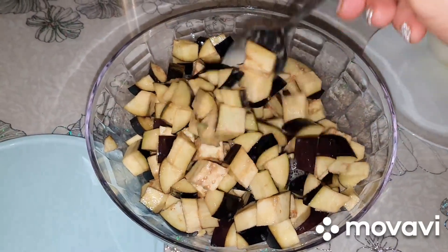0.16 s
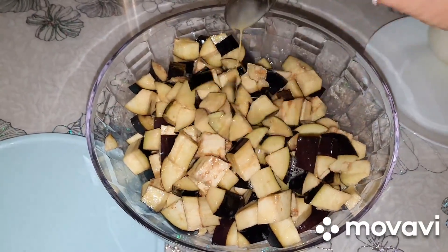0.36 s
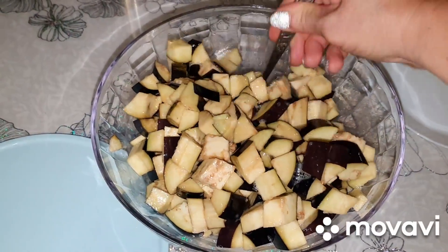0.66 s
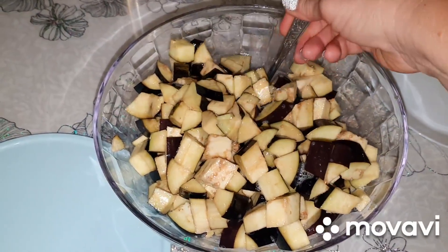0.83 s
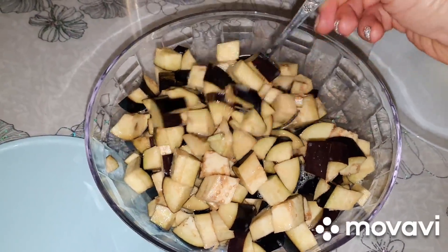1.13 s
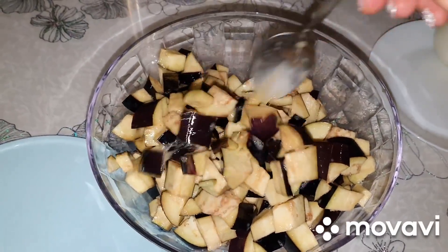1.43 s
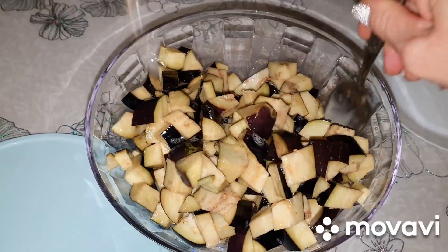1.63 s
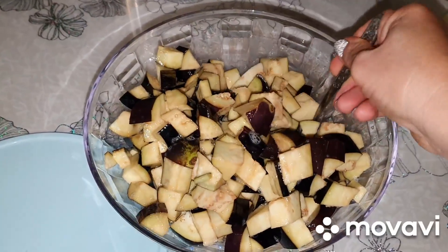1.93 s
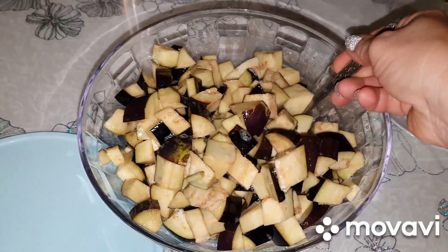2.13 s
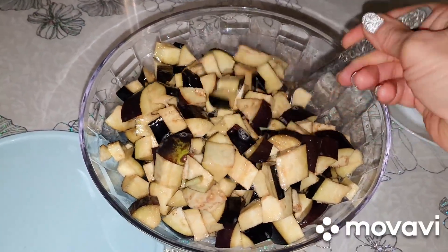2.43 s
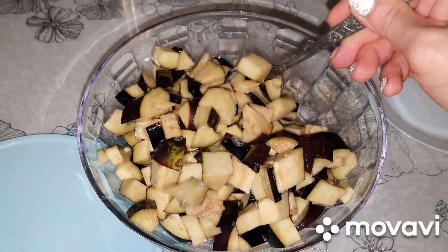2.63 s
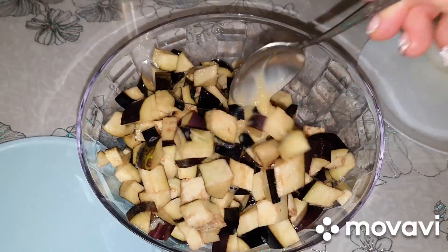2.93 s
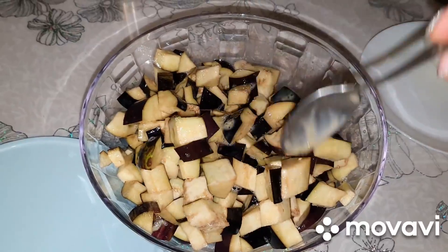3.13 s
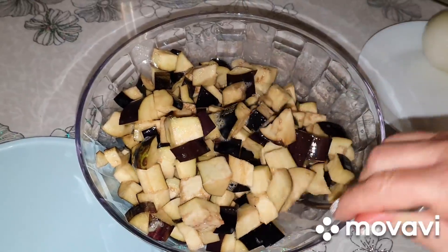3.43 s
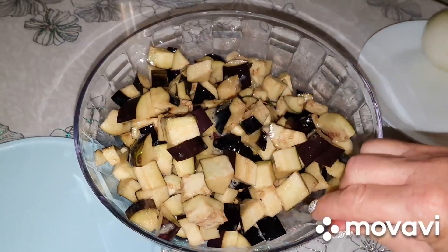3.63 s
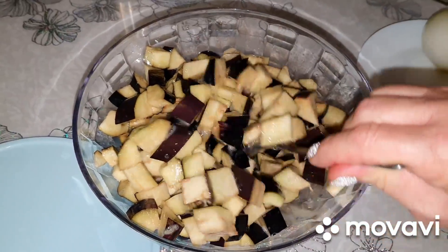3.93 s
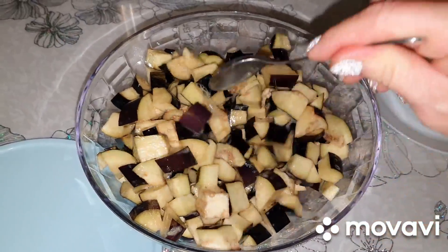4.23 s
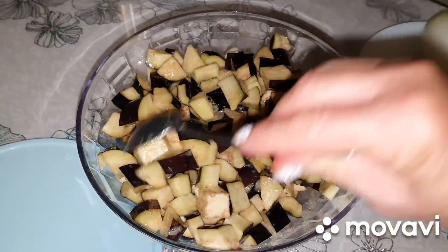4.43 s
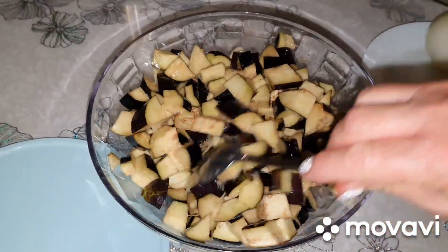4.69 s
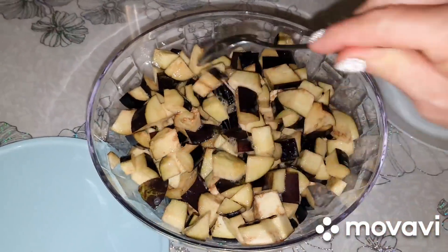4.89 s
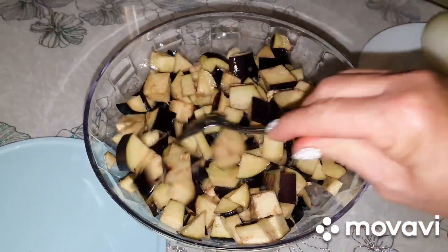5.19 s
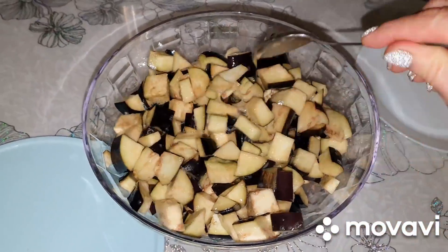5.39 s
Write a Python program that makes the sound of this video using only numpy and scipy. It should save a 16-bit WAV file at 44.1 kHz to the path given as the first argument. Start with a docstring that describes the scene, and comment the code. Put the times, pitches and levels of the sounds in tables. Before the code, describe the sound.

A metal spoon stirs chopped aubergine in a glass bowl, heard close in a kitchen with a short echo. Throughout, the moist pieces softly rub, tick and plop in uneven strokes. The spoon clinks at about 0.5 seconds and gives a louder, muffled clack at 0.7; the filling damps the glass, so it rings only briefly. Two more clacks come at 1.6 and 1.9 seconds, with a tiny squeak of metal on glass. Between 2.1 and 2.4 seconds the bowl rocks on the table in three fading thuds. After quiet shuffling, firm knocks land at 3.3 and 3.6 seconds, with pieces tumbling between them. Another clack follows at 4.6, then gentle stirring and a faint tap near 5.3 seconds. Underneath are faint room hiss, table rumble and a low drone that swells slightly after the heavier knocks.

```python
"""Kitchen table, close stereo microphones: a metal spoon stirs chopped aubergine in a glass bowl.
The filling damps the glass, so each blow is a short clack that the kitchen throws back. The moist pieces
tumble, rub, tick and plop; the spoon sticks and slips on the glass; the bowl rocks and thuds on the table.
Underneath: table rumble, room hiss and a low drone that swells after the heavy blows."""
import sys
import numpy as np
from scipy import signal
from scipy.fft import rfft, irfft
from scipy.io import wavfile
from scipy.ndimage import uniform_filter1d

SR = 44100
rng = np.random.default_rng(int(sys.argv[2]) if len(sys.argv) > 2 else 0)


def generate_wav(sig):
    """Save sig (samples, or channels by samples) to the path in sys.argv[1] as 16-bit PCM at SR."""
    pcm = np.round(np.clip(np.atleast_2d(sig).T, -1, 1) * 32767).astype(np.int16)
    wavfile.write(sys.argv[1], SR, pcm)


N = 244755

# room hiss spectrum (frequency [Hz], gain [dB])
HISS_EQ = [(24, -30), (40, -3), (109, -6), (176, -18), (297, -10.5), (831, -23), (1070, -28.5), (2150, -36),
           (2380, -37.5), (2770, -36), (3140, -30.5), (7360, -44.5), (14500, -43.5), (16000, -56)]
# narrow hiss bands (centre [Hz], width [Hz], level [dB])
HISS_BANDS = [(298, 82, -66), (520, 110, -73), (1120, 130, -76), (2417, 170, -79), (3190, 190, -76),
              (4050, 130, -86), (14450, 350, -89)]
# drone envelope (time [s], level [dB])
DRONE_LEVELS = [(0, -49), (0.35, -55), (0.9, -46.5), (1.25, -70), (1.65, -52), (2.2, -55.5), (2.9, -49),
                (3.3, -51.5), (3.5, -47), (3.8, -53.5), (3.9, -51), (4.33, -58), (4.75, -44), (5.2, -57),
                (5.35, -50.5), (5.5, -82)]
# spoon pushes through the pieces (start [s], length [s], rub [dB], wetness re rub [dB], bulk re rub [dB])
STROKES = [(0.0, 0.3, -57, -8.5, -0.5), (0.51, 0.24, -45, -11.5, 3), (0.91, 0.35, -58, -10, -6),
           (1.335, 0.27, -61.5, -6.5, 0.5), (1.74, 0.13, -48.5, -11, 7.5), (2.099, 0.3, -59, -18.5, 6),
           (2.441, 0.43, -62, -7, 0.5), (3.407, 0.21, -44, -18, -5.5), (3.823, 0.19, -57, -9.5, -3),
           (4.031, 0.28, -63, -3.5, 1), (4.509, 0.19, -53, -4, -2.5), (4.722, 0.12, -68, 1, 8),
           (5.002, 0.34, -58, -8, -1.5), (5.133, 0.25, -63, -2.5, 4), (5.508, 0.048, -55, -7.5, 4.5)]
# spectra of table rumble, tumbling, rubbing, wet crackle, contact chatter (frequency [Hz], gain [dB])
RUMBLE_EQ = [(45, -29.5), (70, -22.5), (85, -8.5), (104, 2.5), (130, -7.5), (180, -27), (400, -58.5)]
TUMBLE_EQ = [(100, -28), (170, -5), (240, 4.5), (300, 4), (400, -7), (600, -11.5), (900, -41),
             (2000, -48.5)]
RUB_EQ = [(400, -23), (750, -4.5), (1100, 0), (1700, -5), (2400, -8), (3300, -10.5), (4500, -18),
          (7000, -31.5), (12000, -44.5)]
CRACKLE_EQ = [(2000, -21.5), (4500, 3.5), (7500, -2.5), (10000, 1.5), (13000, 0.5), (16000, 2)]
CHATTER_EQ = [(150, -20), (700, 6.5), (2000, 3), (14000, -2)]
# single pieces slip, drop or touch the spoon (time [s], tap [dB], wet snap [dB])
TICKS = [(0.126, -57, -61), (0.235, -55, -59), (0.346, -58.5, -71), (0.572, -44.5, -53),
         (0.639, -42.5, -65), (0.976, -46.5, -64), (1.043, -61, -87), (1.162, -57.5, -67.5),
         (1.361, -65.5, -57), (1.442, -70.5, -57.5), (2.132, -53.5, -92), (2.558, -58.5, -87),
         (2.824, -62.5, -65.5), (3.472, -43, -78), (3.482, -39, -75), (3.642, -47, -70),
         (3.912, -52.5, -73), (4.103, -58.5, -63), (4.252, -69, -56.5), (5.056, -62.5, -57),
         (5.135, -57.5, -80), (5.517, -64, -61)]
# cubes fall back on the heap (time [s], level [dB])
PLOPS = [(0.255, -54), (0.624, -45), (0.985, -47.5), (1.556, -49.5), (3.197, -48.5), (3.506, -40),
         (4.116, -62), (5.282, -46), (5.405, -48.5)]
# spoon strikes the bowl, muffled when buried (time [s], level [dB], muffling [dB], low weight [dB],
# main ring [Hz], ring re crack [dB], left minus right [dB], push on table [dB])
KNOCKS = [(0.5081, -34, 0.5, -5, 2940, 15, 0, -54), (0.5811, -40.5, 3.5, -1.5, 1660, -1, -1, -61),
          (0.6943, -42.5, 10.5, -9, 1290, 15, -4, -69.5), (0.7155, -19, 11, -0.5, 1069, 22, -1, -37.5),
          (1.6454, -24, 0.5, -0.5, 3250, 12.5, 0.5, -58), (1.8892, -24, 8.5, -0.5, 2620, 12, -0.5, -40),
          (2.377, -54, 1, -6, 1650, 13, -2.5, -80), (3.2797, -51.5, 4.5, 1.5, 1600, 7, -0.5, -70.5),
          (3.3304, -24, 1, 4.5, 508, 10.5, 0.5, -49), (3.5799, -24.5, 11, -1.5, 764, 11, -1.5, -42.5),
          (3.6911, -42.5, 12.5, -4, 1650, 24, 3, -74), (4.5773, -29.5, 3.5, 1, 2117, 12, 2, -64.5),
          (5.2805, -47, 10, 3.5, 1060, 28, 0.5, -63.5)]
# modes of the filled bowl (frequency [Hz], level re crack [dB], T60 [s])
BOWL_MODES = [(97.2, 16.5, 0.13), (249, 10.5, 0.052), (352, 6.5, 0.053), (510, 6, 0.031), (723, 13, 0.13),
              (970, 8.5, 0.021), (1430, 3, 0.039), (1600, 7, 0.11), (1975, 0, 0.11), (2530, 9, 0.04),
              (3120, 3.5, 0.018), (3860, 2.5, 0.0053), (4480, 1.5, 0.0098), (10000, 8, 0.0053),
              (11810, 7.5, 0.0027), (13400, 5.5, 0.0041), (15200, 2, 0.0048)]
# echoes in the bowl and off the table (delay [s], gain [dB])
NEAR_ECHOES = [(.0012, -5.5), (.0027, -1.5), (.0043, -15.5)]
# bands of a blow; the pieces cushion the treble and pass the force on as a thud
# (centre [Hz], level on bare glass [dB], gain per weight [dB/dB], loss per muffling [dB/dB])
KNOCK_BANDS = [(140, -9.5, 0.8, -.5), (438, 0.5, 1, 0), (950, -0.5, -0.5, 0), (1760, -1, 0, 0.0141),
               (3570, 2, 0.05, 1.15), (5960, -6.5, 0, 1.69), (12000, -3, 0.03, 3)]
# limits of those bands (edge [Hz])
BAND_EDGES_HZ = [70, 280, 650, 1400, 2600, 4800, 8500, 16000]
# spoon slips on the glass (time [s], length [s], start pitch [Hz], end pitch [Hz], level [dB])
SQUEAKS = [(1.849, .034, 990, 1150, -41), (.52, .055, 940, 980, -47)]
# bowl rocks back on the table (time [s], level [dB])
ROCKS = [(2.0695, -22.5), (2.2235, -28.5), (2.373, -36)]
# reverb decay (frequency [Hz], T60 [s])
KITCHEN_T60 = [(100, 1), (300, 0.39), (700, 0.38), (1500, 0.48), (3000, 0.47), (6000, 0.49), (14000, 0.39)]
# reverb spectrum (frequency [Hz], gain [dB])
KITCHEN_EQ = [(100, -10), (300, -4.5), (700, -3.5), (1500, -7.5), (3000, -7), (6000, -6.5), (14000, -11)]
# balance of the direct sound (frequency [Hz], left minus right [dB])
BALANCE = [(100, 0.5), (400, -3.5), (700, -0.5), (1200, 0.5), (2000, 9.5), (3500, 10.5), (6500, 5.5),
           (12000, 17)]
# likeness of the two channels, near and room sound (frequency [Hz], coherence [0-1])
NEAR_COHERENCE = [(300, 0.96), (600, 0.44), (1500, 0.17), (3500, 0.14), (8000, 0.15)]
ROOM_COHERENCE = [(150, 0.83), (350, 0.92), (700, 0.16), (1300, 0), (16000, 0.032)]


def amp(db):
    """dB to gain."""
    return 10 ** (np.asarray(db) / 20)


def unit_rms(x):
    """Scale to RMS 1."""
    return x / np.sqrt(np.mean(x ** 2) + 1e-20)


def attack_db(x):
    """Level of the first 15 ms."""
    return 10 * np.log10(np.mean(x[:, :round(.015 * SR)] ** 2) + 1e-20)


def at_level(x, db):
    """Scale to a given attack level."""
    return x * amp(db - attack_db(x))


def since(onset_s):
    """Seconds since onset, zero before it."""
    return np.maximum(np.arange(N) / SR - onset_s, 0)


def add(mix, time_s, sound):
    """Mix in a stereo sound at time_s."""
    part = mix[:, round(time_s * SR):][:, :sound.shape[1]]
    part += sound[:, :part.shape[1]]


def bins_hz(x):
    """FFT bin frequencies."""
    return np.fft.rfftfreq(x.shape[-1], 1 / SR)


def curve_at(points, hz):
    """Interpolate (frequency [Hz], value) on a log axis."""
    points_hz, values = np.transpose(points)
    return np.interp(np.log(hz + 1), np.log(points_hz), values)


def colour(x, eq):
    """Zero-phase EQ."""
    return irfft(rfft(x) * amp(curve_at(eq, bins_hz(x))), x.shape[-1])


def colour_causal(x, eq):
    """Minimum-phase EQ; keeps attacks sharp."""
    log_gain = np.log(amp(curve_at(eq, bins_hz(x))))
    mirrored = np.r_[log_gain, log_gain[-2:0:-1]]
    phase = -signal.hilbert(mirrored).imag[:len(log_gain)]
    return irfft(rfft(x) * np.exp(log_gain + 1j * phase))


def bandpass(x, low_hz, high_hz, order=3):
    """Butterworth band-pass."""
    return signal.sosfilt(signal.butter(order, [low_hz, high_hz], "band", fs=SR, output="sos"), x)


def stereo_noise(n, coherence, envelope=1):
    """White noise, alike in both channels where the waves are longer than the microphone spacing."""
    noise = envelope * rng.standard_normal((2, n))
    angle = np.arccos(np.clip(curve_at(coherence, bins_hz(noise)), -1, 1)) / 2
    mid, side = rfft(noise) * np.array([np.cos(angle), np.sin(angle)])
    return irfft(np.array([mid + side, mid - side]), n)


def room_hiss(floor_db=-59.5):
    """Steady hiss with a few narrow bands standing out."""
    out = amp(floor_db) * unit_rms(colour(stereo_noise(N, ROOM_COHERENCE), HISS_EQ))
    spectrum = rfft(stereo_noise(N, ROOM_COHERENCE))
    for hz, width_hz, db in HISS_BANDS:
        peak = 1 / (1 + (2 * (bins_hz(out) - hz) / width_hz) ** 2)
        out += amp(db) * unit_rms(irfft(spectrum * peak, N))
    return out


def drone(pitch_hz=47.9, waver_hz=1.1, swell_peak_s=.098, swell_sharpness=6):
    """Wavering low mono tone; swells after the heavy blows."""
    level = amp(np.interp(np.arange(N) / SR, *np.transpose(DRONE_LEVELS)))
    for time_s, *_, push_db in KNOCKS:
        age = since(time_s) / swell_peak_s
        level += amp(push_db) * (age * np.exp(1 - age)) ** swell_sharpness
    waver = unit_rms(colour(rng.standard_normal(N), [(5, 13.5), (12, -28.5), (40, -100)]))
    phase = 2 * np.pi * np.cumsum(pitch_hz + waver_hz * waver) / SR
    return level * np.sqrt(2) * np.sin(phase)


def stroke_gains(rise_s=.04, settle_s=.045, ease_db_per_s=9):
    """Tumble, rub and crackle gains: the spoon takes hold, the heap gives way, the pieces settle."""
    gains = np.zeros((3, N))
    for start_s, length_s, rub_db, wet_db, bulk_db in STROKES:
        t = since(start_s)
        push = np.minimum(t / rise_s, 1) * np.exp(-since(start_s + length_s) / settle_s)
        ease = amp(-ease_db_per_s * (t - length_s / 2))
        gains += amp([[rub_db + bulk_db], [rub_db], [rub_db + wet_db]]) * push * ease
    return gains


def table_rumble(blow_db=3, tumble_db=-6, floor_db=-64, decay_s=.067):
    """Blows and tumbling pieces shake the table, over a faint steady rumble."""
    level = amp(floor_db) + amp(tumble_db) * stroke_gains()[0]
    for time_s, *_, push_db in KNOCKS:
        t = since(time_s)
        level += amp(push_db + blow_db) * (t > 0) * np.exp(-t / decay_s)
    return level * unit_rms(colour(rng.standard_normal(N), RUMBLE_EQ))


def grains(eq, rate_per_s, spread_db, decay_samples=30):
    """Many tiny contacts of uneven size, each a noise burst."""
    sizes = amp(spread_db * np.minimum(rng.exponential(1, N), 4))
    hits = rng.random(N) < rate_per_s / SR
    bursts = signal.lfilter([1], [1, -np.exp(-1 / decay_samples)], sizes * hits)
    return unit_rms(colour(stereo_noise(N, NEAR_COHERENCE, bursts), eq))


def squelch(x, depth_db=2.8, patch_s=.025, patch_hz=1000):
    """No two pieces sound alike: the colour shifts in short random patches."""
    frames = signal.stft(x, SR, nperseg=256)[2]
    patches = rng.standard_normal(frames.shape[1:])
    patches = uniform_filter1d(patches, size=round(patch_hz * 256 / SR), axis=0)
    patches = uniform_filter1d(patches, size=round(patch_s * SR / 128), axis=1)
    frames *= amp(depth_db * unit_rms(patches))
    return unit_rms(signal.istft(frames, SR, nperseg=256)[1][:, :N])


def stirring(tumble_db=-2, rub_db=-3.5, crackle_db=-1):
    """Pieces tumble, rub and crackle with juice as the spoon pushes through."""
    tumble, rub, crackle = stroke_gains()
    bumps = grains(TUMBLE_EQ, rate_per_s=700, spread_db=1.5)
    slips = squelch(grains(RUB_EQ, rate_per_s=1600, spread_db=2.0))
    snaps = squelch(grains(CRACKLE_EQ, rate_per_s=1200, spread_db=2.9))
    return amp(tumble_db) * tumble * bumps + amp(rub_db) * rub * slips + amp(crackle_db) * crackle * snaps


def ticks(tap_trim_db=-1, tap_rise_s=.0008, tap_decay_s=.004, snap_trim_db=-3, snap_decay_s=.0036):
    """A moist piece lets go with a snap and taps its neighbour."""
    out, t = np.zeros((2, N)), np.arange(SR // 20) / SR
    for time_s, tap_db, snap_db in TICKS:
        noise = stereo_noise(len(t), NEAR_COHERENCE)
        tap = colour(noise, RUB_EQ) * (1 - np.exp(-t / tap_rise_s)) * np.exp(-t / tap_decay_s)
        snap = colour(noise, CRACKLE_EQ) * np.exp(-t / snap_decay_s)
        add(out, time_s, at_level(tap, tap_db + tap_trim_db) + at_level(snap, snap_db + snap_trim_db))
    return out


def plops(rise_s=.003, decay_s=.013):
    """A soft cube lands with a dull bump."""
    out, t = np.zeros((2, N)), np.arange(SR // 8) / SR
    envelope = (1 - np.exp(-t / rise_s)) * np.exp(-t / decay_s)
    for time_s, db in PLOPS:
        bump = colour(stereo_noise(len(t), NEAR_COHERENCE), TUMBLE_EQ)
        add(out, time_s, at_level(bump * envelope, db))
    return out


def spoon_contact(t, chatter_db=2, decay_s=.0043):
    """Metal meets glass: an impulse crack, then brief chatter."""
    burst = stereo_noise(len(t), NEAR_COHERENCE) * np.exp(-t / decay_s)
    chatter = colour(burst, CHATTER_EQ) * np.sqrt(2 / (decay_s * SR)) * (t < .1)
    return (t == 0) + amp(chatter_db) * chatter


def bowl_ring(t, ring_hz, ring_db, ring_cycles=12, base_t60_s=.0024, spread_hz=1800):
    """Damped bowl modes plus the ring of the struck spot; high modes differ in phase per microphone."""
    out = np.zeros((2, len(t)))
    for hz, db, t60_s in BOWL_MODES + [(ring_hz, ring_db, base_t60_s + ring_cycles / ring_hz)]:
        phase = rng.uniform(-.81, 1, (2, 1)) * min(hz / spread_hz, 1)
        decay_per_s = np.log(1000) / t60_s
        envelope = 2 * decay_per_s / SR * amp(db) * np.exp(-decay_per_s * t)
        out += envelope * np.cos(2 * np.pi * hz * t + phase)
    return out


def knock(bands_db, ring_hz, ring_db, echoes):
    """One blow: contact, echoes and bowl ring, equalised to bands_db."""
    t = np.arange(2 ** 14) / SR
    contact = spoon_contact(t)
    blow = contact.copy()
    for delay_s, db in echoes:
        paths_s = rng.uniform(.78, 1.15, 2) * delay_s  # each spot has its own path to each microphone
        for side, path_s in enumerate(paths_s):
            blow[side] += amp(db) * np.roll(contact[side], round(path_s * SR))
    blow += bowl_ring(t, ring_hz, ring_db)
    centres_hz = np.transpose(KNOCK_BANDS)[0]
    for _ in range(2):  # second pass settles steep slopes
        now_db = [attack_db(bandpass(blow, *edges)) for edges in zip(BAND_EDGES_HZ, BAND_EDGES_HZ[1:])]
        blow = colour_causal(blow, np.column_stack([centres_hz, bands_db - now_db]))
    return colour_causal(blow, [(30, -22), (90, 0)])


def knocks(echoes, ring_trim_db=0):
    """Spoon blows on the bowl: cushioning takes off treble, weight adds body."""
    out = np.zeros((2, N))
    _, bare_db, weight_slope, muffle_slope = np.transpose(KNOCK_BANDS)
    for time_s, level_db, muffle_db, weight_db, ring_hz, ring_db, left_db, _ in KNOCKS:
        bands_db = level_db + bare_db + weight_db * weight_slope - muffle_db * muffle_slope
        blow = knock(bands_db, ring_hz, ring_db + ring_trim_db, echoes)
        add(out, time_s, blow * amp([[left_db / 2], [-left_db / 2]]))
    return out


def squeaks(harmonic_step_db=-10, pitch_jitter=.06, roughness=.4):
    """Stick-slip of spoon on glass: short, rising, unsteady in pitch and grip."""
    out = np.zeros((2, N))
    for time_s, length_s, start_hz, end_hz, db in SQUEAKS:
        n = round(length_s * SR)
        wobble, grip = unit_rms(uniform_filter1d(rng.standard_normal((2, SR)), size=60))[:, :n]
        hz = np.linspace(start_hz, end_hz, n) * (1 + pitch_jitter * wobble)
        phase = 2 * np.pi * np.cumsum(hz) / SR
        tone = sum(amp(harmonic_step_db * k) * np.sin((k + 1) * phase) for k in range(3))
        envelope = (1 + roughness * grip) * signal.windows.tukey(n, .5)
        add(out, time_s, np.tile(amp(db) * unit_rms(tone * envelope), (2, 1)))
    return out


def bowl_rocks(thud_hz=262, sweep_hz=290, sweep_s=.003, rise_s=.001, decay_s=.013,
               boom_hz=107, boom_decay_s=.014, boom_db=-6, scuff_db=-10):
    """Thuds through the table: high bending waves arrive first, so the tone falls; the top booms."""
    out, t = np.zeros((2, N)), np.arange(SR // 4) / SR
    rise, decay = 1 - np.exp(-t / rise_s), np.exp(-t / decay_s)
    hz = thud_hz + sweep_hz * np.exp(-t / sweep_s)
    thud = np.sin(2 * np.pi * np.cumsum(hz) / SR) * decay
    boom = amp(boom_db) * np.sin(2 * np.pi * boom_hz * t) * np.exp(-t / boom_decay_s)
    for time_s, db in ROCKS:
        scuff = amp(scuff_db) * unit_rms(bandpass(rng.standard_normal(len(t)), 110, 620, order=4)) * decay
        add(out, time_s, np.tile(amp(db) * (thud + boom + scuff) * rise, (2, 1)))
    return out


def kitchen_reverb(x, predelay_s=.0052, build_s=.0051):
    """Dense reflections off near walls, each band with its own decay."""
    hz, t, frames = signal.stft(stereo_noise(SR, ROOM_COHERENCE), SR, nperseg=256)
    frames *= amp(-60 * t / curve_at(KITCHEN_T60, hz)[:, None])
    tail = signal.istft(frames, SR, nperseg=256)[1][:, :SR]
    onset = np.clip((np.arange(SR) / SR - predelay_s) / build_s, 0, 1)
    response = colour(unit_rms(tail) / np.sqrt(SR), KITCHEN_EQ) * onset
    return signal.fftconvolve(x, response, axes=1)[:, :N]


def lean_left(x):
    """The left microphone faces the bowl and gets more treble."""
    ratio = amp(curve_at(BALANCE, bins_hz(x)))
    gains = np.array([ratio, np.ones_like(ratio)]) * np.sqrt(2 / (1 + ratio ** 2))
    return irfft(rfft(x) * gains, x.shape[-1])


def scene(small_send_db=-1, rocks_send_db=-5):
    """Bowl sounds, direct and reverberant, over drone, rumble and hiss."""
    small = ticks() + plops() + stirring() + squeaks()
    rocks = bowl_rocks()
    # the room hears all sides of the bowl: no near echoes, less ring from one spot
    far_knocks = knocks(echoes=[], ring_trim_db=-2.5)
    room = kitchen_reverb(far_knocks + amp(small_send_db) * small + amp(rocks_send_db) * rocks)
    direct = lean_left(knocks(NEAR_ECHOES) + small + rocks)
    return direct + room + drone() + table_rumble() + room_hiss()


def record(dry, low_cut_hz=30, high_cut_hz=16150):
    """Microphone bass roll-off, full-scale clip, band limit."""
    high_pass = signal.butter(4, low_cut_hz, "high", fs=SR, output="sos")
    clipped = np.clip(signal.sosfilt(high_pass, dry), -1, 1)
    low_pass = signal.firwin(255, high_cut_hz, window=("kaiser", 8), fs=SR)
    return signal.oaconvolve(clipped, low_pass[None], "same", axes=1)


dry = scene()
out = record(dry)
generate_wav(out)
```